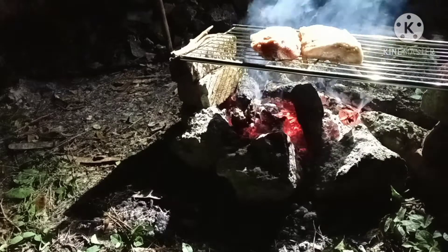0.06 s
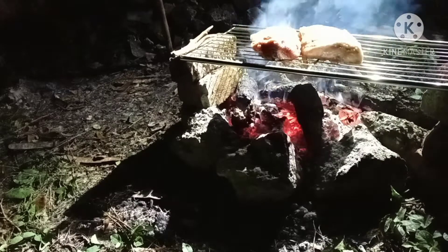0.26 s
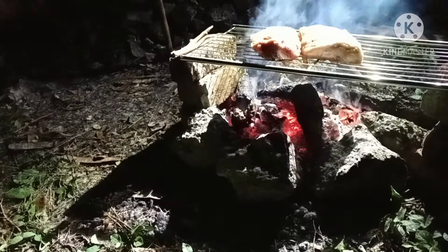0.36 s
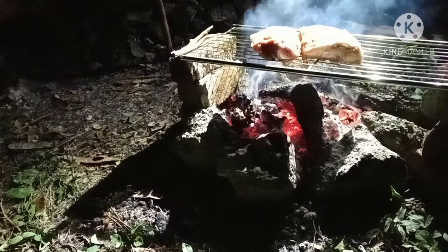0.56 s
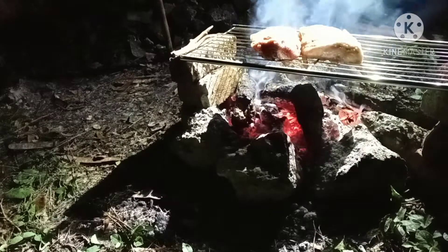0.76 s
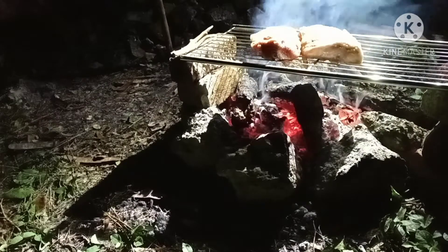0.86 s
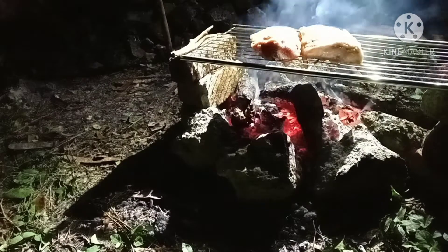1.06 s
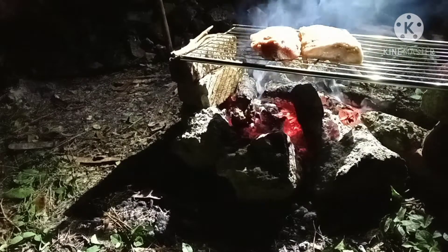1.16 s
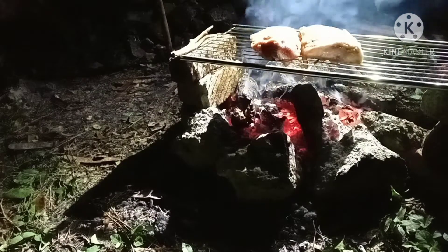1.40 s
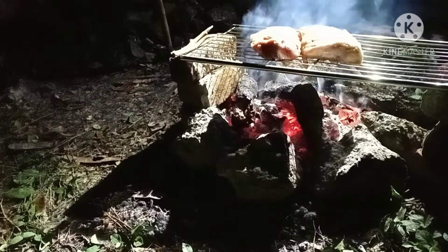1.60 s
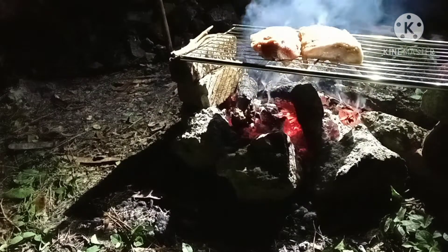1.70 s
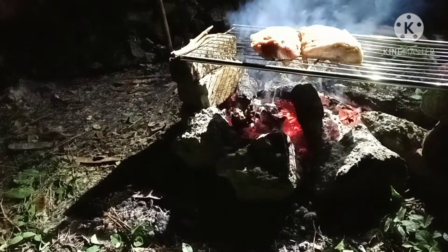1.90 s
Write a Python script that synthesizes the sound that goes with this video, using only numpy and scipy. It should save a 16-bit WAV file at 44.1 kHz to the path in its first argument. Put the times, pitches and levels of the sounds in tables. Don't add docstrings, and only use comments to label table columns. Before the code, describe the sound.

A metal grill clangs brightly once, then knocks dully, over snapping embers and trilling crickets

```python
import sys
import numpy as np
from scipy import signal
from scipy.fft import rfft, irfft, next_fast_len
from scipy.io import wavfile
from scipy.ndimage import uniform_filter1d, map_coordinates

SR = 44100
rng = np.random.default_rng(int(sys.argv[2]) if len(sys.argv) > 2 else 0)


def amplitude_ratio(level_db):
    exponent = np.asarray(level_db, float) / 20
    return 10 ** exponent


def unload_wav(signal):
    wavfile.write(
        sys.argv[1],
        SR,
        np.round(np.clip(np.atleast_2d(signal).T, -1, 1) * 32767).astype(np.int16),
    )


N = 83790
SOFT_S = 0.0017

# start in seconds, peak in dB, clatter in dB.
MESH_HITS = [
    (0.205, -23, 0),
]
# frequency in Hz, level in dB.
SNAP = [(1500, -41), (3500, -10.5), (8500, 4.5), (12000, 3.5), (16000, -3)]


def unit(x):
    return x / np.sqrt(np.mean(x ** 2) + 1e-20)


def along(points, hz):
    f, v = np.transpose(points)
    return np.interp(np.log(hz + 1), np.log(f + 1), v)


def wobble(rate, size=N):
    knots = rng.standard_normal(600)
    return map_coordinates(knots, [np.arange(size) * rate / SR], mode="wrap", order=2)


def coloured(x, spectrum):
    m = next_fast_len(len(x) + 4096)
    hz = np.fft.rfftfreq(m, 1 / SR)
    low_cut = np.minimum(1, hz / spectrum[0][0]) ** 3
    return irfft(rfft(x, m) * amplitude_ratio(along(spectrum, hz)) * low_cut, m)[:len(x)]


def rush(spectrum, patchy_db):
    z = signal.stft(rng.standard_normal(N + 512), nperseg=512)[2]
    field = uniform_filter1d(rng.standard_normal(z.shape), 6, 0)
    field = uniform_filter1d(field, 10, 1)
    patchy = signal.istft(z * amplitude_ratio(patchy_db * unit(field)), nperseg=512)[1][:N]
    return unit(coloured(patchy, spectrum))


def ringing_modes(modes, t):
    hz, db, t60 = np.transpose(modes)[:, :, None]
    waver = np.array([[wobble(90, size=len(t)) for mode in modes] for part in ("level", "phase")])
    waver = np.minimum(1, hz / 2500) * (waver - waver[..., :1])
    level_db = db - 60 * t / t60 + 3.5 * np.tanh(waver[0])
    return (amplitude_ratio(level_db) * np.sin(2 * np.pi * hz * t + 0.7 * waver[1])).sum(0)


def clattering_wires(t, top_hz):
    # frequency in Hz, level in dB.
    clatter = [(300, -51), (800, -9), (3000, -8), (8000, -0.5), (15000, 3.5)]
    # frequency in Hz, decay time t60 in seconds.
    clatter_t60 = [(500, 0.2), (3000, 0.16), (7000, 0.1), (15000, 0.041)]
    low_hz = 1098.6
    pick, size, life = rng.random((3, 90, 1))
    wire_hz = low_hz * (top_hz / low_hz) ** pick
    wire_t60 = 0.18 * (0.18 + life) * (2000 / wire_hz) ** 1.2
    wire_db = -16.5 + along(clatter, wire_hz) - 10 * size
    wire_db = wire_db - 5 * np.log2(wire_hz / 3000) ** 2 / 2
    swarm = (amplitude_ratio(wire_db - 60 * t / wire_t60) * np.sin(2 * np.pi * wire_hz * t)).sum(0)

    f, u, z = signal.stft(rng.standard_normal(len(t)), SR, nperseg=128)
    f = f[:, None]
    gain = amplitude_ratio(along(clatter, f) - 60 * u / along(clatter_t60, f)) / (1 + (f / top_hz) ** 4)
    shake = signal.istft(z * gain, SR, nperseg=128)[1][:len(t)]
    return shake * amplitude_ratio(3 * wobble(200, size=len(t))) + swarm


def strike(modes, hits, top_hz, rise):
    out, t = np.zeros(N + SR), np.arange(SR * 3 // 10) / SR
    onset = (1 - np.exp(-t / rise)) ** 2
    for s, peak_db, clatter_db in hits:
        blow = ringing_modes(modes, t) + amplitude_ratio(clatter_db + 3.0) * clattering_wires(t, top_hz)
        out[round(s * SR):][:len(t)] += amplitude_ratio(peak_db) * onset * blow
    return out[:N]


def hard_knocks():
    # frequency in Hz, level in dB, decay time t60 in seconds.
    mesh = [(744, -0.5, 0.14), (790, 0, 0.23), (1140, -20, 0.2), (1453, -11, 0.17), (1776, -15, 0.089),
            (1949, -6.5, 0.12), (2229, -22, 0.28), (2627, -24, .3), (2753, 3, 0.034), (2859, -19, 0.2),
            (2982, -24, .4), (3241, -15, 0.21), (3666, -19, .17), (3895, -11, 0.27)]
    # frequency in Hz, level in dB, t60 in seconds.
    wires = [(4156, -20, 0.36), (4750, -28, 0.072), (5448, -8, 0.069), (5870, -22, 0.11), (6200, -23, .06),
             (7260, -13, .07), (8520, -9, 0.096), (9360, -7, 0.056)]
    # start in seconds, peak in dB, clatter in dB.
    wire_hits = [
        (0.2066, -22, -0.5),
    ]
    # frequency in Hz, level in dB, t60 in seconds.
    foot = [(314, 7, 0.036), (826, -1, 0.14), (935, -2, 0.095), (1180, 3.5, 0.025), (1890, 0.5, 0.017),
            (2750, -3.5, 0.046)]
    # start in seconds, peak in dB, clatter in dB.
    foot_hits = [
        (1.277, -37.5, -3),
    ]
    bodies = [(mesh, MESH_HITS), (wires, wire_hits), (foot, foot_hits)]
    return sum(strike(modes, hits, top_hz=12000, rise=0.00087) for modes, hits in bodies)


def bent_sheet():
    # frequency in Hz, level in dB, t60 in seconds.
    plate = [(588, -22.5, 1.65), (860, -18.5, 0.62), (918, -7.5, 0.34)]
    # time in seconds, pitch rise as a share.
    flex = [(.2, -0.0053), (.45, 0.059), (.52, 0.045), (.6, -0.02)]
    start, peak_db = MESH_HITS[0][:2]
    age = np.maximum(np.arange(N) / SR - start, 0)
    turns = np.cumsum(1 + np.interp(age + start, *np.transpose(flex))) / SR
    damped = (1 - np.exp(-age / (2 * SOFT_S))) / (1 + ((age + start) / flex[-1][0]) ** 30)
    return damped * sum(amplitude_ratio(peak_db + db - 60 * age / t60) * np.sin(2 * np.pi * hz * turns)
                        for hz, db, t60 in plate)


def soft_knocks():
    # frequency in Hz, level in dB, t60 in seconds.
    rods = [(785, -4, 0.12), (860, 8, 0.053), (985, -8.5, 0.076), (1173, -14, 0.16), (1582, 6, 0.014),
            (1646, -20, 0.18), (2115, -15.5, 0.056), (2430, -8.5, 0.034), (2744, -21, 0.2),
            (3430, -39, 0.038), (3760, -25, 0.077), (4900, -24, 0.059), (5486, -26, 0.042)]
    # start in seconds, peak in dB, clatter in dB.
    rod_hits = [
        (.4915, -22.5, -12.5),
        (.909, -46.5, -30),
        (.922, -56, -26),
        (1.655, -60, -30),
    ]
    # frequency in Hz, level in dB, t60 in seconds.
    frame = [(776, 1, 0.068), (852, 5.5, 0.05), (916, -8.5, 0.18), (1170, -13, 0.24), (1304, -21, 0.32),
             (1490, -22.5, 0.14), (592, -17.5, 0.27), (1776, -13, 0.16), (2340, -19, 0.19),
             (2743, -17.5, 0.056), (2740, -23.5, 0.26), (3490, -23.5, 0.14), (3860, -25, 0.25),
             (5500, -24.5, 0.086)]
    # start in seconds, peak in dB, clatter in dB.
    frame_hits = [
        (0.5443, -24, -11),
    ]
    # frequency in Hz, level in dB, t60 in seconds.
    handle = [(765, 5, 0.055), (790, -14, .15), (904, -20, .2), (985, -16.5, 0.22), (1136, -6, 0.1),
              (1421, -21, 0.1), (1750, -28, 0.095), (2401, -28, .1), (2650, -18, 0.073), (2772, -19, 0.09),
              (3208, -34, .2), (3747, -29, .1), (4576, -22, 0.085)]
    # start in seconds, peak in dB, clatter in dB.
    handle_hits = [
        (0.742, -25, -18),
    ]
    # frequency in Hz, level in dB, t60 in seconds.
    corner = [(712, 3, 0.051), (765.2, 3, 0.11), (788.4, -11.5, 0.26), (897, -13, 0.11),
              (1436, -16.5, 0.079), (1530, -23.5, 0.2), (1697, -28.5, 0.18), (1860, -36, 0.23),
              (2267, -23, 0.096), (2700, -17.5, 0.067), (3940, -23.5, 0.057), (4550, -32, .05),
              (5840, -24, 0.063)]
    # start in seconds, peak in dB, clatter in dB.
    corner_hits = [
        (1.4055, -24.5, -20),
    ]
    # frequency in Hz, level in dB, t60 in seconds.
    catch = [(720, -3.5, 0.058), (860, 7, 0.046), (1710, -28, 0.038), (2680, -9, 0.046), (3700, -16, 0.12),
             (4980, -12, 0.078), (5400, -12, 0.034)]
    # start in seconds, peak in dB, clatter in dB.
    catch_hits = [
        (1.576, -38, -7),
    ]
    # frequency in Hz, level in dB, t60 in seconds.
    tip = [(680, -2.5, 0.045), (1143, 1.5, 0.11), (1800, -9.5, 0.097), (2704, -14.5, 0.06)]
    # start in seconds, peak in dB, clatter in dB.
    tip_hits = [
        (0.9833, -36.5, -6.5),
    ]
    # frequency in Hz, level in dB, t60 in seconds.
    pluck = [(4030, -2, 0.11), (5000, -10, 0.022)]
    # start in seconds, peak in dB, clatter in dB.
    pluck_hits = [
        (.361, -52, -17),
        (1.458, -57.5, -8),
        (1.693, -77, 7),
    ]
    # frequency in Hz, level in dB, t60 in seconds.
    tap = [(756, 4, 0.038), (885, -13.5, 0.097)]
    # start in seconds, peak in dB, clatter in dB.
    tap_hits = [
        (.385, -43, -40),
        (.607, -29.5, -48),
        (.691, -38, -42),
        (1.706, -42.5, -40),
    ]
    # frequency in Hz, level in dB, t60 in seconds.
    rim = [(863, 4.5, 0.053), (1170, -6.5, 0.072), (2120, -10.5, 0.032), (2600, -20.5, 0.069),
           (4030, -25, .06), (4990, -12, 0.044)]
    # start in seconds, peak in dB, clatter in dB.
    rim_hits = [
        (1.0775, -36, -7.5),
    ]
    bodies = [(rods, rod_hits), (frame, frame_hits), (handle, handle_hits), (corner, corner_hits),
              (catch, catch_hits), (tip, tip_hits), (pluck, pluck_hits), (tap, tap_hits), (rim, rim_hits)]
    return sum(strike(modes, hits, top_hz=5450, rise=SOFT_S) for modes, hits in bodies)


def scraping_wires():
    # start in seconds, end in seconds, level in dB.
    scrapes = [
        (0.085, 0.167, -56.5),
        (0.25, 0.293, -51),
        (0.3, 0.385, -47),
        (1.382, 1.42, -51),
    ]
    # frequency in Hz, level in dB.
    drag = [(800, -34), (2000, -1.5), (4000, -2.5), (9000, 3), (15000, -7.5)]
    t = np.arange(N) / SR
    stroke = sum(amplitude_ratio(db) * np.sin(np.pi * np.clip((t - a) / (b - a), 0, 1)) ** 0.75
                 for a, b, db in scrapes)
    grit = rng.standard_normal(N) * amplitude_ratio(2.2 * wobble(250))
    return stroke * unit(coloured(grit, drag))


def held_hum():
    # frequency in Hz, level in dB.
    glow = [(450, -8), (700, 2.5), (900, 1), (1200, -6), (1800, -22)]
    # time in seconds, level in dB.
    held = [(0, -61), (.45, -58), (.85, -57.5), (1.65, -57.5), (1.75, -60.5)]
    level_db = np.interp(np.arange(N) / SR, *np.transpose(held)) + 2.05 * wobble(24.79)
    return amplitude_ratio(level_db) * rush(glow, patchy_db=2.0)


def ember_snaps():
    # start in seconds, peak in dB, brightness in dB per octave.
    snaps = [(0.0414, -33, 5), (0.112, -38, 5), (0.1303, -33, -3), (0.1671, -29, -3), (0.341, -33, 7),
             (0.3478, -29, -3), (0.363, -35, 24), (0.5227, -17.5, 6.5), (0.788, -41, 13), (0.818, -32, 9),
             (0.826, -43, 6), (0.9083, -26.5, 1.5), (1.0205, -31.5, 2), (1.0612, -41, 2), (1.087, -48, 13),
             (1.2615, -40, 7), (1.297, -31.5, 11), (1.3106, -56, -3), (1.388, -43, 0), (1.4378, -38, 8),
             (1.6955, -36, 0.5)]
    out, t = np.zeros(N + SR), np.arange(2048) / SR
    click = np.exp(-(t / 0.00012) ** 2)
    husk = amplitude_ratio(-9) * np.exp(-(t / 0.001) ** 4)
    spit = amplitude_ratio(-17 - 60 * t / 0.035)
    for s, peak_db, bright_db in snaps:
        burst = rng.standard_normal(len(t)) * (click + husk + spit)
        burst[0] = 4
        tilted = [(f, db + bright_db * np.log2(f / 8000)) for f, db in SNAP]
        burst = coloured(np.pad(burst, (64, 0)), tilted)
        start = round((s + 0.001) * SR) - 64
        out[start:][:len(burst)] += amplitude_ratio(peak_db + 6) * burst / np.abs(burst).max()
    return out[:N]


def ember_ticks():
    chance, size, sign = rng.random((3, N))
    ticks = (chance < 150 / SR) * amplitude_ratio(-2.5 * np.log(size)) * np.sign(sign - .5)
    return amplitude_ratio(-56.5 + 12) * coloured(ticks, SNAP)


def sizzling_fat():
    # time in seconds, level in dB.
    sizzle = [(0, -56.5), (.4, -55.5), (.6, -60.5), (1.3, -58.5), (1.9, -61.5)]
    # frequency in Hz, level in dB.
    fat = [(3000, -53), (4500, -9), (5800, -11), (7400, -14), (8300, 0.5), (12000, -5.5), (15500, -2.5)]
    level_db = np.interp(np.arange(N) / SR, *np.transpose(sizzle)) + wobble(11.34)
    return amplitude_ratio(level_db) * rush(fat, patchy_db=1.4)


def far_crickets():
    # pitch in Hz, level in dB, wing strokes per second.
    singers = [(6220, -72.5, 25), (6520, -70, 86), (6602, -61.5, 57), (6795, -56.5, 59), (6790, -58, 45),
               (6937, -59.5, 45), (6830, -59, 110)]
    # time in seconds, level in dB.
    chorus = [(0, 0), (.7, -3), (.93, -0.5), (1.22, -2.5), (1.3, -3), (1.45, -3), (1.55, 2.5), (1.7, -5),
              (1.82, 1.5)]
    out, t = np.zeros(N), np.arange(N) / SR
    for hz, db, rate in singers:
        u = (np.cumsum(rate * (1 + 0.0842 * wobble(4.7))) / SR + rng.random()) % 1
        pitch = hz + 40 * wobble(3) - 51.4 * (u - .4)
        phase = 2 * np.pi * np.cumsum(pitch) / SR + 1.7 * wobble(130)
        stroke = .25 + np.sin(np.pi * u) ** 2
        out += amplitude_ratio(db) * unit(amplitude_ratio(2.5 * wobble(9)) * stroke * np.sin(phase))
    return out * amplitude_ratio(np.interp(t, *np.transpose(chorus)) + 1.2 * wobble(22.05))


def near_crickets():
    # start in seconds, length in seconds, level in dB.
    high_phrases = [(-.03, 0.14, -54), (0.264, 0.13, -52), (0.521, 0.14, -49), (0.784, 0.12, -65),
                    (0.906, .12, -55), (1.073, 0.13, -51), (1.227, 0.117, -50), (1.434, 0.089, -51),
                    (1.526, 0.12, -53.5), (1.785, .15, -48)]
    # start in seconds, length in seconds, level in dB.
    low_phrases = [(.35, 0.18, -60), (.71, 0.19, -60), (1.05, .12, -61), (1.35, 0.17, -60),
                   (1.66, .12, -63)]
    out, t = np.zeros(N), np.arange(N) / SR
    for hz, phrases in [(6990, high_phrases), (6455, low_phrases)]:
        for s, length, db in phrases:
            gate = np.clip(np.minimum(t - s, s + length - t) / 0.011, 0, 1)
            strokes = .3 + np.sin(np.pi * 30.1 * (t - s)) ** 2
            tone = np.sin(2 * np.pi * hz * t + 1.1 * wobble(80))
            out += amplitude_ratio(db + 3.5 * wobble(40)) * gate * strokes * tone
    return out


def night_rumble():
    # frequency in Hz, level in dB.
    night = [(25, -22), (50, -14.5), (85, 1), (125, -4), (250, -13), (450, -27), (850, -26.5), (1500, -46)]
    return amplitude_ratio(-50.5 + 1.5 * wobble(5)) * rush(night + [(3000, -60)], patchy_db=1.5)


def microphone_hiss():
    # frequency in Hz, level in dB.
    air = [(1000, -16), (1500, 5), (3000, -4), (5000, 12), (8000, -9)]
    return amplitude_ratio(-79 + 1.0 * wobble(1.4)) * rush(air, patchy_db=1)


def scene():
    grill = hard_knocks() + bent_sheet() + soft_knocks() + scraping_wires() + held_hum()
    fire = ember_snaps() + ember_ticks() + sizzling_fat()
    crickets = far_crickets() + near_crickets()
    return (grill + fire + crickets + night_rumble() + microphone_hiss())[None]


def low_pass(x):
    return signal.sosfilt(signal.butter(12, 16630, fs=SR, output="sos"), x)


def record(dry):
    hz = np.fft.rfftfreq(N, 1 / SR)
    mix = irfft(rfft(dry) * np.where(hz < 15700, 1, amplitude_ratio(-30)), N)
    return low_pass(mix)


dry = scene()
out = record(dry)
unload_wav(out)
```